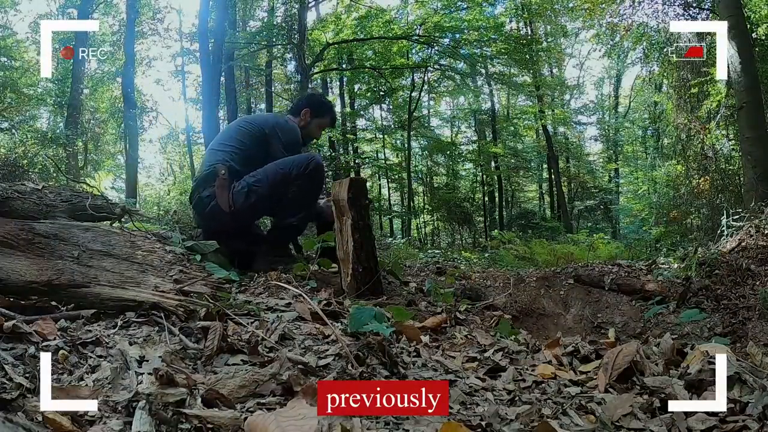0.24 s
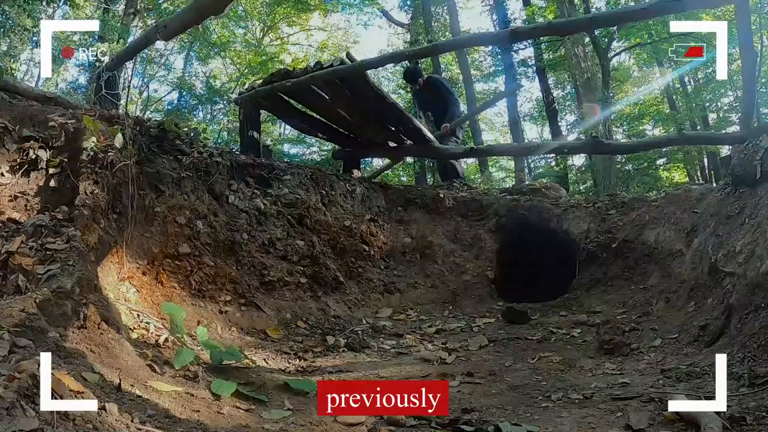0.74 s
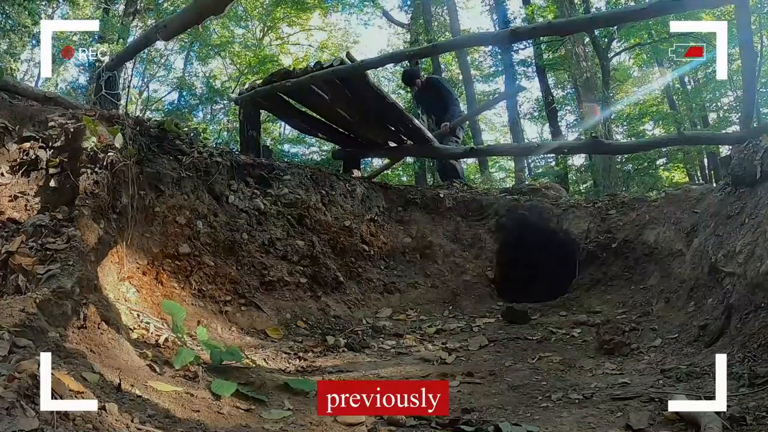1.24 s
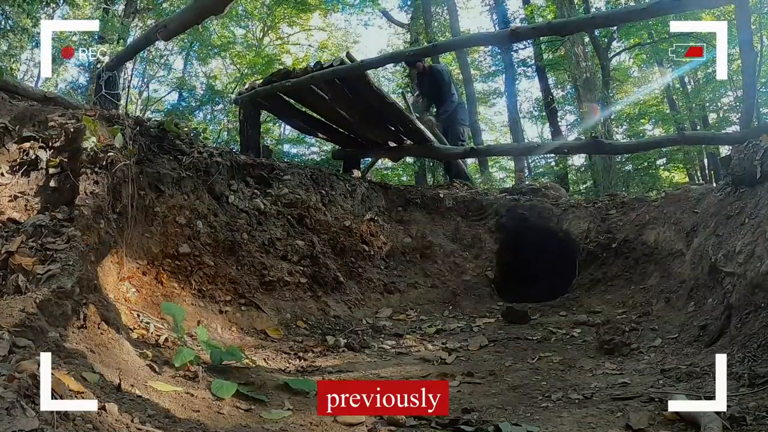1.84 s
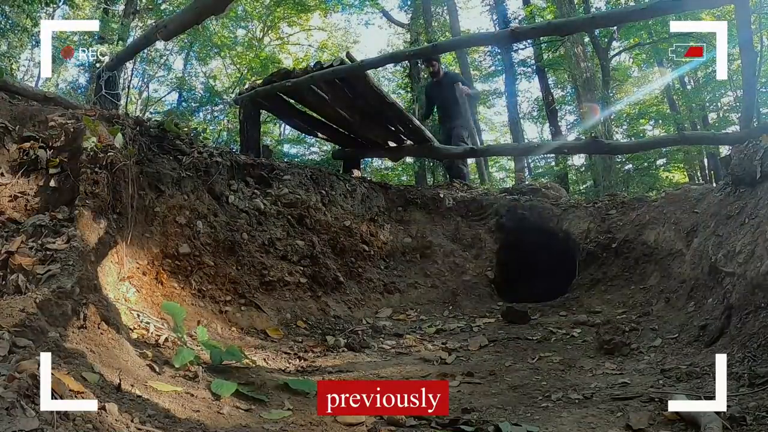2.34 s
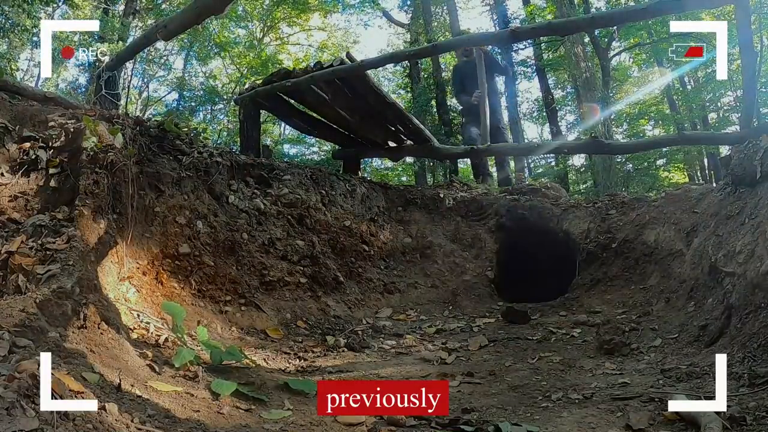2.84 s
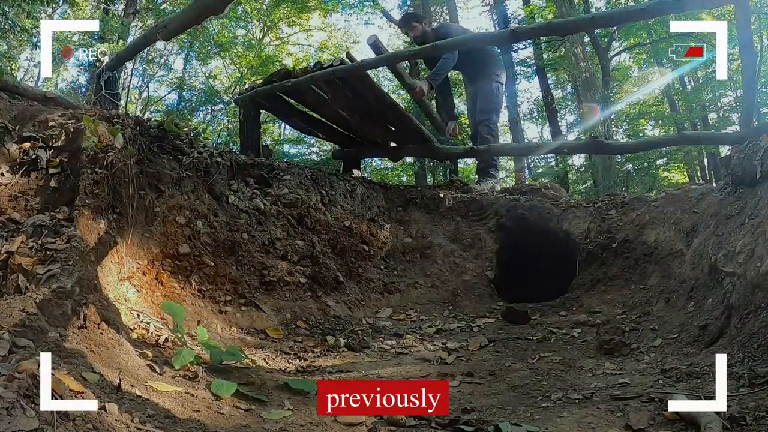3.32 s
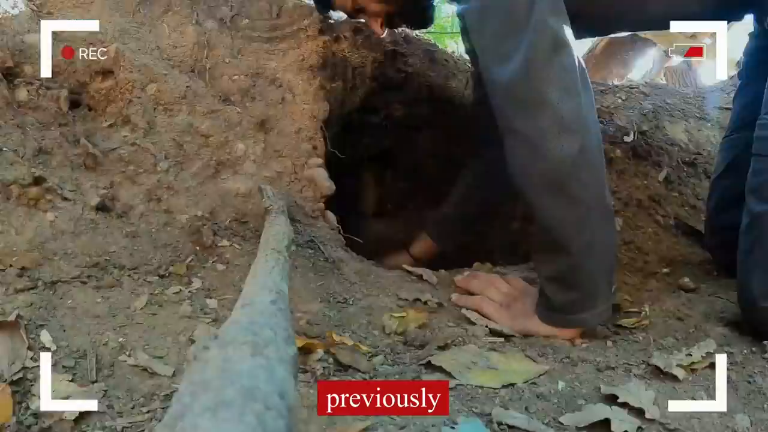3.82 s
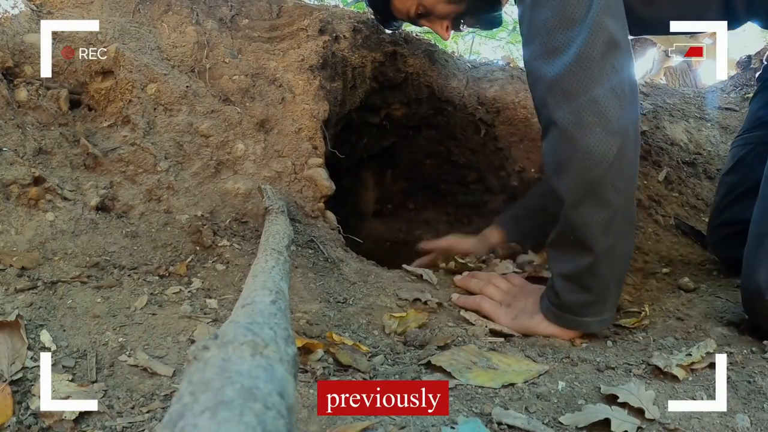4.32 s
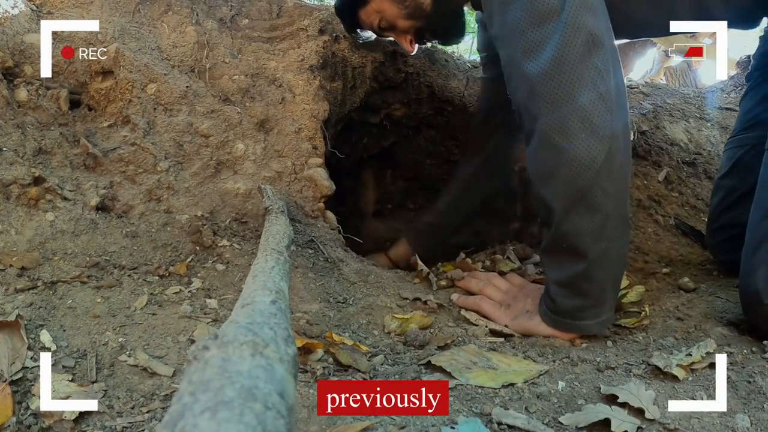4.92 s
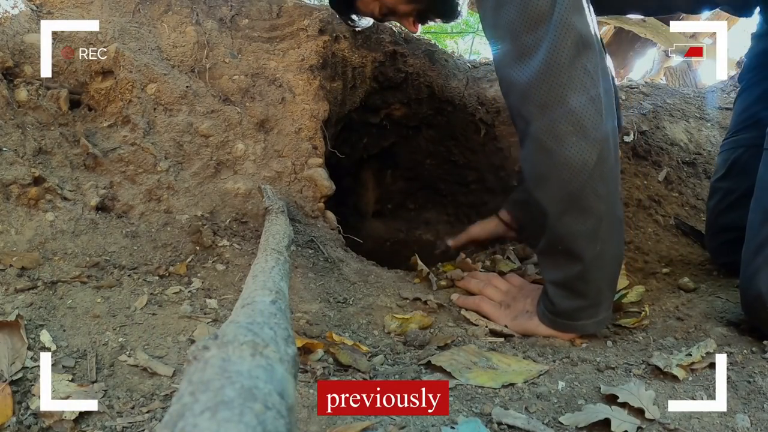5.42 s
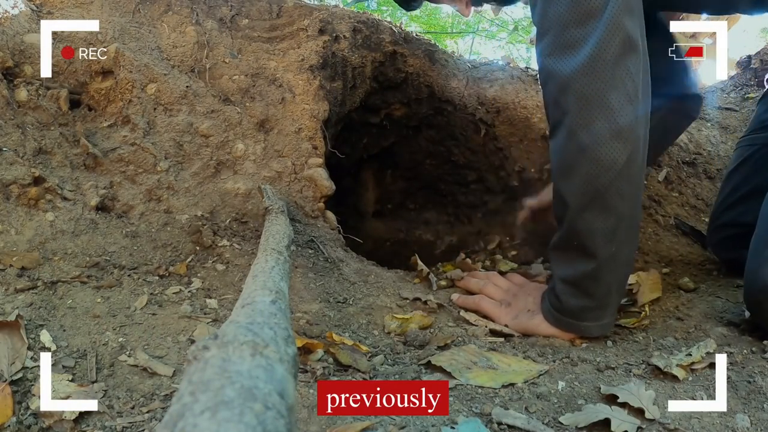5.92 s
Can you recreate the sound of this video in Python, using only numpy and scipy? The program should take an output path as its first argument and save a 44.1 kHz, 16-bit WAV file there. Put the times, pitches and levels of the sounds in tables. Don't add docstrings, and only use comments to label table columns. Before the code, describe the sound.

In a quiet forest, wood thuds, leaves crunch in quick strokes, poles clack hard, then fingers rustle and dig in an earth hollow.

```python
import sys
import numpy as np
from scipy import signal
from scipy.fft import rfft, irfft, next_fast_len
from scipy.io import wavfile
from scipy.ndimage import uniform_filter1d

SR = 44100
rng = np.random.default_rng(int(sys.argv[2]) if len(sys.argv) > 2 else 0)


def transcribe(u):
    v = np.clip(np.atleast_2d(u).T, -1, 1)
    q = np.round(v * 32767).astype(np.int16)
    wavfile.write(sys.argv[1], SR, q)


def makeup_ratio(level_db):
    decades = np.asarray(level_db, float) / 20
    return 10 ** decades


N = 271598

# peak t/s, length/s, level/dB
PUSHES = [
    (.568, 0.021, -28.5),
    (.706, 0.027, -34.5),
    (.857, 0.029, -32.5),
    (1.0, 0.032, -33.5),
    (1.134, 0.029, -34.5),
    (1.282, 0.031, -35.5),
    (1.437, 0.022, -30),
    (1.589, 0.033, -37.5),
    (1.731, 0.021, -36),
]
# peak t/s, length/s, level/dB
PULLS = [(.625, 0.05, -44.5), (.765, 0.01, -37), (.796, 0.017, -45.5), (.915, 0.0072, -33.5),
         (1.051, 0.026, -38), (1.1855, 0.0075, -39.5), (1.209, 0.02, -42.5), (1.341, 0.035, -40),
         (1.405, 0.028, -43), (1.498, 0.015, -33.5), (1.52, 0.019, -44.5), (1.6155, 0.0072, -41),
         (1.691, 0.096, -44)]
# peak t/s, length/s, level/dB
STEPS = [(1.79, 0.016, -57), (1.925, 0.037, -48), (1.807, 0.013, -45.5), (1.864, 0.032, -52),
         (1.895, 0.0063, -47), (1.952, 0.016, -45.5), (2.016, 0.015, -45), (2.084, 0.058, -49.5),
         (2.126, 0.026, -41), (2.187, 0.017, -46.5), (2.229, 0.02, -52.5), (2.274, 0.026, -46),
         (2.384, 0.014, -55), (2.664, 0.0089, -48.5), (3.607, 0.054, -67)]
# peak t/s, length/s, level/dB
BRUSHES = [
    (1.66, 0.055, -50),
    (2.695, 0.026, -43.5),
    (2.76, 0.35, -56.5),
    (2.948, 0.048, -50),
    (3.034, 0.12, -56),
    (3.197, 0.067, -50),
]
# peak t/s, length/s, level/dB
SCOOPS = [(3.879, 0.038, -45.5), (3.937, 0.029, -37.5), (3.97, 0.022, -50), (4.022, 0.035, -42),
          (4.108, 0.049, -47), (4.185, 0.042, -50), (4.228, 0.018, -52), (4.279, 0.025, -45.5),
          (4.308, 0.079, -46.5), (4.404, 0.027, -46), (4.438, 0.049, -43.5), (4.507, 0.04, -50.5),
          (4.571, 0.093, -51.5), (4.654, 0.03, -50), (4.692, 0.015, -43), (4.714, 0.029, -38),
          (4.742, 0.071, -50.5), (4.826, 0.032, -52), (5.924, 0.056, -44), (6.04, 0.05, -48.5),
          (6.142, 0.054, -42.5)]
# peak t/s, length/s, level/dB
DIGS = [(5.037, 0.029, -58.5), (5.165, 0.035, -57.5), (5.214, 0.0087, -60), (5.256, 0.025, -51),
        (5.315, 0.014, -61), (5.365, 0.049, -59.5), (5.472, 0.017, -55), (5.51, 0.025, -62),
        (5.569, 0.025, -62), (5.634, 0.05, -60), (5.737, 0.048, -60), (5.837, 0.047, -60)]
# peak t/s, length/s, level/dB
BARK_SCRAPES = [
    (.118, 0.028, -56),
    (.148, 0.013, -48),
    (.461, 0.0034, -50),
    (3.445, 0.0036, -56),
    (3.772, 0.0078, -43),
    (3.778, 0.0029, -32.5),
]
# t/s, peak level/dB, f/Hz
FAR_SNAPS = [(0.5638, -17.5, 3110), (0.6189, -27, 10900), (0.6926, -23, 10000), (0.7027, -39, 6200),
             (0.7079, -19, 10750), (0.7642, -43, 6500), (0.7958, -34, 9000), (0.8424, -32, 9400),
             (0.8577, -25, 6600), (0.8628, -25, 6560), (0.9134, -46, 6100), (0.9872, -16.5, 6340),
             (0.996, -36, 5300), (1.0037, -24, 7340), (1.0685, -32, 3580), (1.1065, -48, 3600),
             (1.1172, -27, 6260), (1.1365, -26, 9800), (1.1432, -21.5, 6130), (1.1842, -27, 10600),
             (1.2124, -34, 8600), (1.2568, -30, 6400), (1.2709, -21, 6300), (1.2778, -26, 9650),
             (1.2865, -23, 7540), (1.3423, -29, 6560), (1.4242, -18, 6240), (1.4354, -25, 7460),
             (1.4916, -34, 6100), (1.4963, -43, 10200), (1.501, -22, 7100), (1.5593, -27, 10100),
             (1.5868, -36, 10300), (1.6169, -36, 5160), (1.6932, -30, 7070), (1.7196, -26, 5800),
             (1.7269, -23.5, 7400), (1.7315, -24, 9700), (1.7343, -24, 4930), (1.8615, -27.5, 9550),
             (1.8931, -28.5, 8400), (2.0214, -34, 3800), (2.1089, -43, 4700), (2.1264, -26, 3530),
             (2.2692, -31, 9900), (2.2783, -33, 9750)]
# t/s, peak level/dB, f/Hz
NEAR_SNAPS = [(3.8792, -38, 10800), (3.9022, -40, 7900), (3.9352, -30.5, 3020), (3.9723, -40, 7200),
              (3.9818, -37, 14000), (4.1199, -34, 12000), (4.1266, -44, 13000), (4.1625, -52, 1700),
              (4.1968, -43, 5000), (4.1996, -46, 10000), (4.2061, -37, 9300), (4.2343, -37, 8400),
              (4.2471, -41, 2100), (4.294, -32, 13000), (4.3111, -46, 9900), (4.3532, -36, 2600),
              (4.4016, -39, 9300), (4.4041, -37, 5460), (4.4229, -48, 13000), (4.4389, -35, 11000),
              (4.5286, -44, 11000), (4.5371, -33, 11000), (4.5498, -34, 4100), (4.5777, -41, 6100),
              (4.5884, -44, 6960), (4.5996, -52, 8300), (4.6038, -37, 2290), (4.6115, -37, 11000),
              (4.6538, -46, 13000), (4.6559, -37, 13000), (4.6639, -34, 5400), (4.6766, -41, 11000),
              (4.6808, -42, 11000), (4.6931, -36, 11000), (4.7133, -33, 12100), (4.7256, -47, 10000),
              (4.76, -36, 11000), (4.7925, -41, 5600), (4.8199, -53, 9500), (4.8302, -47, 12000),
              (4.8478, -42, 14000), (4.8638, -38, 6100), (5.0272, -37, 5600), (5.2141, -40, 12900),
              (5.2488, -43, 4000), (5.4568, -47, 13000), (5.4727, -37, 7800), (5.6352, -52, 7500),
              (5.7213, -47, 7600), (5.836, -41, 5900), (5.9125, -45, 6900), (5.9209, -35, 13000),
              (5.9483, -33, 5200), (5.9556, -35, 11000), (6.0283, -48, 2600), (6.0436, -30.5, 11100),
              (6.1403, -38, 8500), (6.1437, -37, 7150)]
# t/s, peak level/dB, f/Hz
BODY_BUMPS = [(0.565, -29, 825), (0.581, -28.5, 776), (0.703, -35, 865), (0.854, -32, 945),
              (0.986, -27.5, 803), (1.048, -39.5, 690), (1.138, -37, 790), (1.274, -29.5, 820),
              (1.341, -39, 1110), (1.384, -37, 500), (1.433, -27, 720), (1.495, -35, 567),
              (1.728, -35.5, 930), (1.894, -36, 1410), (2.081, -44, 566), (2.125, -36, 1340),
              (2.39, -30.5, 543), (2.4285, -27.5, 1520), (2.698, -36, 605), (3.173, -40, 580)]
# t/s, level/dB, contact/ms, pitch ratio, ring share
STUMP_BLOWS = [
    (.1502, -13, 0.13, 0.925, 0.62),
]
# t/s, level/dB, contact/ms, pitch ratio, ring share
A_KNOCKS = [
    (1.882, -38.5, 0.096, 1.04, 0.54),
    (1.892, -30, 0.12, 0.55, 0.32),
    (2.08, -32, 0.12, 0.73, 0.61),
    (2.427, -22.5, 0.11, 1.13, 0.54),
    (3.498, -20, 0.19, 0.95, 1.17),
    (3.508, -42, 0.052, 1.7, 1.2),
    (3.522, -8, 0.028, 1.0, 0.78),
]
# t/s, level/dB, contact/ms, pitch ratio, ring share
B_KNOCKS = [
    (2.1905, -17.5, 0.72, 1.46, 0.22),
    (2.385, -37, 0.086, 0.93, 0.27),
    (3.172, -27, 0.75, 1.7, 0.34),
    (3.7395, -25.5, 0.0062, 0.73, 0.99),
    (3.7695, -24, .002, 2.1, 0.47),
    (3.7765, -12, 0.0076, 1.0, 1),
    (4.162, -37, 0.37, 0.43, 0.23),
]
# f/Hz, level/dB, t60/s
STUMP_MODES = [(178, 2, 0.078), (239, 8, 0.099), (301, 27, 0.062), (346, 22.5, 0.059), (474, 16, 0.058),
               (917, 18, 0.033), (1140, 8, 0.032)]
# f/Hz, level/dB, t60/s
POLE_A_MODES = [(240, -7.5, 0.059), (397, -15, 0.077), (551, -6.5, 0.043), (790, -2, 0.031),
                (975, -16, 0.051), (1160, -4, 0.014), (1410, -11, 0.015), (1764, -6.5, 0.031),
                (1950, -5, 0.059), (2160, -27, 0.048), (2770, -2.5, 0.0092), (3496, -1, 0.022)]
# f/Hz, level/dB, t60/s
POLE_B_MODES = [(233, -2.5, 0.034), (384, -5, 0.012), (520, -34, 0.017), (735, -11, 0.022),
                (852, -14, 0.055), (1027, -14.5, 0.033), (1310, -8, 0.024), (1750, -10, 0.017),
                (2010, -2.5, 0.03), (2790, -17, .03), (3550, -10, 0.026)]
# low f/Hz, high f/Hz, level/dB, decay/ms
SPLINTERS = [(400, 2500, 0, 5.5), (2500, 5000, -4, 2.4), (5000, 17000, -7, 1.1)]
# t/s, peak level/dB
CLODS = [(3.933, -41.5), (3.944, -39.5), (3.957, -44), (4.025, -40.5), (4.038, -47), (4.113, -44),
         (4.163, -37.5), (4.18, -43), (4.279, -42), (4.385, -39), (4.394, -39), (4.404, -39.5),
         (4.453, -44), (4.628, -43.5), (4.763, -43), (4.903, -42), (4.916, -38.5), (5.021, -43),
         (5.035, -34.5), (5.043, -40), (5.053, -40), (5.162, -48), (5.182, -51), (5.249, -45), (5.284, -39),
         (5.295, -53), (5.381, -41), (5.487, -48), (5.568, -43.5), (5.578, -48), (5.637, -45), (5.657, -41),
         (5.746, -46), (5.818, -54), (5.844, -53), (5.94, -53), (5.96, -45), (5.971, -42), (6.097, -48),
         (6.105, -43)]
# t/s, peak level/dB, f/Hz
THUDS = [(3.897, -32.5, 180), (3.94, -31.5, 155), (3.999, -37, 180), (4.025, -39, 178), (4.052, -38, 249),
         (4.096, -37, 181), (4.126, -39, 152), (4.231, -33, 158), (4.256, -33, 210), (4.288, -32, 215),
         (4.341, -47, 219), (4.391, -36, 184), (4.525, -32.5, 161), (4.577, -33.5, 190), (4.607, -37, 170),
         (4.66, -37, 200), (4.698, -34, 270), (4.727, -36, 189), (4.772, -38, 312), (4.816, -34, 231),
         (4.839, -39, 200), (4.916, -36, 161), (4.952, -34, 260), (5.099, -32.5, 185), (5.173, -34, 203),
         (5.213, -33, 290), (5.263, -40, 240), (5.286, -40, 220), (5.312, -37, 180), (5.337, -31, 222),
         (5.385, -32.5, 172), (5.412, -33, 340), (5.462, -36, 344), (5.529, -36, 256), (5.554, -33, 285),
         (5.578, -34, 183), (5.644, -36, 278), (5.707, -29.5, 176), (5.805, -39, 190), (5.916, -30, 217),
         (5.947, -31.5, 161), (5.979, -31, 275), (6.04, -36.5, 343), (6.092, -39, 343)]
# f/Hz, level/dB per Hz
FAR_COLOUR = [(350, -16), (600, 0.5), (801, 8.5), (1290, -0.5), (1450, 4), (2150, -7), (2750, -17),
              (3350, -10.5), (4340, -15.5), (5050, -7.5), (6290, -9.5), (7940, -12.5), (10300, -9.5),
              (16000, -29)]
# f/Hz, level/dB per Hz
NEAR_COLOUR = [(350, 0.5), (600, -2), (687, 8), (1030, -2), (1360, -2), (2190, -7.5), (3520, -15),
               (5590, -12), (15500, -14)]
# f/Hz, level/dB per Hz
OPEN_RUMBLE = [(15, -52), (25, -23), (102, 1.5), (168, 1.5), (477, -13.5), (802, -18.5), (1320, -25.5),
               (1540, -30), (2500, -41.5), (3250, -41), (5500, -120)]
# f/Hz, level/dB per Hz
HOLLOW_RUMBLE = [(15, -62), (25, -30), (144, 1.5), (221, 1.5), (393, -6.5), (772, -17), (1090, -26),
                 (1350, -24.5), (1600, -33.5), (2500, -43.5), (3250, -50), (5500, -120)]
# t/s, effort/dB
EFFORT = [(0, 1), (.55, 2.5), (.57, 5), (.85, 5), (.95, 0), (1.4, 4), (1.8, 1.5), (2.45, 2.5), (2.55, 0),
          (3.2, 2), (3.75, 2), (4.05, -1), (4.6, 2), (4.95, 2), (6.16, 1.5)]
# f/Hz, level/dB per Hz
HISS = [(600, -40), (1100, -14), (1800, -7), (2650, -19), (3400, -6), (6000, -7), (11000, -8), (16000, -13)]
# f/Hz, level/dB per Hz
GUST = [(15, -45), (25, -16), (80, 14.5), (199, 3), (375, -6.5), (1120, -60), (3300, -120)]
# t/s, level/dB
WIND = [(0, -64.5), (.54, -76), (.57, -55), (1.2, -59), (1.4, -24), (1.58, -29), (1.75, -44), (2.0, -37.5),
        (2.2, -23), (2.4, -52), (2.6, -40), (3.25, -67), (3.58, -44), (3.7, -35), (3.85, -43), (4.0, -97)]
# t/s, level/dB
BUFFETS = [(1.386, -15.5), (1.407, -20), (1.491, -27), (1.517, -22), (1.538, -24.5), (1.562, -19.5),
           (1.611, -35), (1.63, -24.5), (1.644, -27), (1.691, -27.5), (1.821, -26), (1.841, -26),
           (1.954, -29), (1.975, -15), (1.991, -21), (2, -16), (2.03, -16.5), (2.072, -30.5),
           (2.161, -22.5), (2.196, -17.5), (2.226, -27), (2.249, -25.5), (2.339, -24.5), (2.365, -27),
           (2.393, -17), (2.403, -20), (2.581, -28), (3.48, -32.5), (3.711, -24), (3.754, -34)]

# rising share of length, soil body/dB, body lost per force/dB per dB, brightness/dB
PUSH, PULL, STEP = (0.79, -14, -0.35, 1.5), (0.58, -19, 0, 1), (0.5, -17.5, -0.18, -5.5)
SCOOP, DIG, SCRAPE = (0.31, -9, 0.58, 3.5), (0.37, -8, -0.27, -4), (1.6, -15, 1.5, 5)
BRUSH = (0.56, -12, 0.18, 7)
USUAL_FORCE_DB = -45
# rumble level/dB, hiss level/dB
CLEARING, WOODS, HOLLOW = (-55.5, -58.5), (-44, -57.5), (-48, -62)

FIRST_CUT_S, CUT_S = 0.556, 3.85
T_S = np.arange(N) / SR
CLOSE = np.clip((T_S - CUT_S) / 0.02, 0, 1)


def unit(x):
    return x / np.sqrt(np.mean(x ** 2) + 1e-30)


def shape(table, size):
    bin_hz = np.arange(size // 2 + 1) * SR / size + 1
    hz, db = np.array(table, float).T
    return makeup_ratio(np.interp(np.log(bin_hz), np.log(hz), db)), bin_hz


def bandpass(x, low_hz, high_hz, order=2):
    return signal.sosfilt(signal.butter(order, [low_hz, high_hz], "bandpass", fs=SR, output="sos"), x)


def add(out, at_s, sound):
    i = int(at_s * SR)
    out[..., i:i + sound.shape[-1]] += sound[..., :N - i]


def ports(x, share):
    step_rad, resonance_hz, hz_per_rad = 0.36, 2900, 20000
    left, right = np.broadcast_to(x, (2, N))
    hz = np.arange(N // 2 + 1) * SR / N + 1
    lag_rad = step_rad / (1 + (resonance_hz / hz) ** 6) + hz / hz_per_rad
    return np.array([irfft(rfft(left) * np.exp(-1j * share * lag_rad), N), right])


def crunches(table, gesture, colour, loose_hz, grain_db, clump_db, ripple_db, bite, edge, size=8192):
    lead_s = 0.07
    out, late = np.zeros((2, N)), np.arange(size) / SR - lead_s
    gain, hz = shape(colour, size)
    share, soil_db, soil_loss, bright_db = gesture
    tilt = makeup_ratio(bright_db * np.clip(np.log2(hz / 7500) / 0.61, -1, 1) / 2)
    low = 1 / (1 + (hz / 2700) ** 6)
    for s, length_s, db in table:
        rise_s = max(share * length_s - 0.004, 0.001)
        fall_s = max((1 - share) * length_s, 0.002)
        rising = (np.maximum(-late, 0) / rise_s) ** bite
        falling = (np.abs(late) / fall_s) ** edge
        reach = np.where(late < 0, rising, falling)
        stir_s = np.minimum(length_s, np.where(late < 0, 0.022 * share, 0.02))
        litter = makeup_ratio(-15) * np.exp(-np.abs(late) / stir_s)
        snaps = rng.standard_normal((2, size)) * makeup_ratio(grain_db * rng.exponential(size=size))
        clumps = makeup_ratio(clump_db * np.repeat(rng.standard_normal(size // 64), 64))
        swarm = snaps * clumps / np.sqrt(np.mean(snaps ** 2) * np.mean(clumps ** 2))
        mid, side = rfft(swarm * (makeup_ratio(-6 * reach) + litter))
        ripple = makeup_ratio(ripple_db * np.interp(hz, np.linspace(0, SR / 2, num=40), rng.standard_normal(40)))
        leaf = unit(gain * ripple * tilt * (1 - low))
        soil = unit(gain * ripple * low) * makeup_ratio(soil_db - soil_loss * (db - USUAL_FORCE_DB))
        apart = side * np.clip(0.05 + hz / loose_hz, 0, 1)
        stroke = irfft(np.array([mid + apart, mid - apart]) * (leaf + soil), size)
        add(out, s - lead_s, makeup_ratio(db) * stroke)
    return out


def grains(table, rise_s, fall_s, level_db, dust_db, dust_hz, size=4000):
    out, t = np.zeros(N), (np.arange(size) - size // 2) / SR
    reach = np.where(t < 0, np.exp(-(t / rise_s) ** 2), 1 / np.cosh(t / fall_s))
    for s, db, hz in table:
        noise = rng.standard_normal(size)
        ring = np.cos(2 * np.pi * hz * t + noise[0])
        dust = makeup_ratio(dust_db) * unit(bandpass(noise, *dust_hz))
        add(out, s + t[0], makeup_ratio(db + level_db) * (ring + dust) * reach)
    return out


def raked_litter():
    far = crunches(BRUSHES, BRUSH, NEAR_COLOUR, loose_hz=30000, grain_db=2, clump_db=2, ripple_db=2.5,
                   bite=2.2, edge=1.6)
    for strokes, gesture in [(PUSHES, PUSH), (PULLS, PULL), (STEPS, STEP)]:
        far = far + crunches(strokes, gesture, FAR_COLOUR, loose_hz=40000, grain_db=2.3, clump_db=2.2,
                             ripple_db=3, bite=2.5, edge=1.6)
    far = far + grains(FAR_SNAPS, 0.00014, 0.0013, level_db=-7, dust_db=-4.5, dust_hz=[3100, 14000])
    far = far + grains(BODY_BUMPS, 0.0024, 0.0029, level_db=-5, dust_db=-7.5, dust_hz=[450, 1600])
    return ports(far * (T_S > FIRST_CUT_S), share=1)


def hand_in_leaves():
    near = grains(NEAR_SNAPS, 0.0002, 0.0004, level_db=-6, dust_db=-1, dust_hz=[1800, 15000])
    for strokes, gesture in [(SCOOPS, SCOOP), (DIGS, DIG)]:
        near = near + crunches(strokes, gesture, NEAR_COLOUR, loose_hz=90000, grain_db=2.5, clump_db=2.2,
                               ripple_db=2.5, bite=2.6, edge=2.8)
    return near


def knocks(table, modes, swell_ms, glancing=True, size=6000):
    bloom_per_cycle = 0.021
    out, t = np.zeros(N), np.arange(size) / SR
    mode_hz, mode_db, t60_s = np.array(modes).T[:, :, None]
    for s, db, contact_ms, ratio, share in table:
        hz, swell = mode_hz * ratio, swell_ms * share
        phase = 2 * np.pi * (hz * t + glancing * rng.random(hz.shape))
        weight = makeup_ratio(mode_db) / (1 + (2 * np.pi * hz * contact_ms / 1000) ** 2)
        bloom = 1 - np.exp(-t * 1000 / (swell * bloom_per_cycle * mode_hz * t60_s))
        decay = np.exp(-np.log(1000) * t / (t60_s * share))
        rise = 1 - np.exp(-t * 1000 / swell)
        body = rise * np.sum(weight * bloom * np.sin(phase) * decay, axis=0)
        crack = 0
        for low_hz, high_hz, band_db, decay_ms in SPLINTERS:
            band = unit(bandpass(rng.standard_normal(size), low_hz, high_hz))
            crack = crack + makeup_ratio(band_db) * band * np.exp(-t * 1000 / (decay_ms * share))
        crack_db = -2.5 - 60 * contact_ms - 0.36 * (db + 29.5)
        add(out, s, makeup_ratio(db) * (body / np.abs(body).max() + makeup_ratio(crack_db) * crack * np.sqrt(rise)))
    return out


def wood():
    blows = knocks(STUMP_BLOWS, STUMP_MODES, swell_ms=2.3, glancing=False)
    blows = blows + knocks(A_KNOCKS, POLE_A_MODES, swell_ms=0.83)
    blows = blows + knocks(B_KNOCKS, POLE_B_MODES, swell_ms=2.5)
    return signal.sosfilt(signal.butter(2, 120, "highpass", fs=SR, output="sos"), blows)


def bark():
    return crunches(BARK_SCRAPES, SCRAPE, NEAR_COLOUR, loose_hz=90000, grain_db=2, clump_db=1, ripple_db=2,
                    bite=2, edge=2)


def earth():
    rows = [(s, db, 678 * (1 + 0.12 * rng.standard_normal())) for s, db in CLODS]
    clods = grains(rows, 0.0015, 0.003, level_db=-0.5, dust_db=-14.5, dust_hz=[500, 2200])
    return clods + grains(THUDS, 0.0025, 0.0044, level_db=-3, dust_db=-20.5, dust_hz=[120, 500])


def walk(rate_hz):
    k = int(SR / rate_hz)
    held = np.repeat(rng.standard_normal(N // k + 2), k)
    return unit(uniform_filter1d(uniform_filter1d(held, k), k)[:N])


def restless(table, count, swell_db, flicker_db, rate_hz, loose_hz):
    size = next_fast_len(N)
    gain, hz = shape(table, size)
    out, swell = 0, walk(rate_hz)
    for centre_hz in table[1][0] * 2.0 ** np.arange(count):
        octave = np.cos(np.clip(np.log2(hz / centre_hz), -1, 1) * np.pi / 2)
        mid, side = irfft(rfft(rng.standard_normal((2, size))) * gain * octave, size)[:, :N]
        side = side * np.sqrt(np.clip(centre_hz / loose_hz, 0, 1))
        level = makeup_ratio(swell_db * swell + flicker_db * walk(2 * rate_hz))
        out = out + level * np.array([mid + side, mid - side])
    return unit(out)


def buffets():
    out, t = np.zeros((2, N)), (np.arange(2000) - 1000) / SR
    for s, db in BUFFETS:
        hz = 269 + 4.5 * db
        phase, detune = rng.standard_normal(2)
        eddy = np.cos(2 * np.pi * hz * t + phase) * np.exp(-(t * hz / 0.47) ** 2)
        tap_hz = 420 * (1 + 0.19 * detune)
        tap = np.cos(2 * np.pi * tap_hz * t + np.array([[0], [1.4]])) * np.exp(-(t / 0.0025) ** 2)
        tap = tap * makeup_ratio(-17 + 0.7 * (db + 16)) * np.array([[1], [0.65]])
        add(out, s + t[0], makeup_ratio(db + 5) * (eddy * np.array([[1], [0]]) + tap))
    return out


def wind():
    gust_db = np.interp(T_S, *np.transpose(WIND)) - 3
    gust = restless(GUST, count=6, swell_db=3.5, flicker_db=2, rate_hz=40, loose_hz=9e9)[0]
    return gust * makeup_ratio(gust_db) * np.array([[1], [0]]) + buffets()


def still_db(column):
    clearing, woods, hollow = CLEARING[column], WOODS[column], HOLLOW[column]
    return np.where(T_S < FIRST_CUT_S, clearing, woods + CLOSE * (hollow - woods))


def rumble():
    woods = restless(OPEN_RUMBLE, count=8, swell_db=2.2, flicker_db=1.2, rate_hz=25, loose_hz=16000)
    hollow = restless(HOLLOW_RUMBLE, count=8, swell_db=2.2, flicker_db=1.2, rate_hz=25, loose_hz=70000)
    exposed = np.clip((T_S - FIRST_CUT_S) / 0.002, 0, 1) * (1 - CLOSE)
    thin = (T_S < FIRST_CUT_S) * 14 + 9 * np.clip((T_S - CUT_S) / 1.3, 0, 1) ** 3
    ground = exposed * woods + (1 - exposed) * hollow + thin * np.diff(hollow, prepend=0)
    return makeup_ratio(still_db(0) + np.interp(T_S, *np.transpose(EFFORT))) * ground


def crumbs(rate_hz, spread_db):
    ticks = (rng.random(N) < rate_hz / SR) * rng.standard_normal(N)
    return unit(bandpass(ticks * makeup_ratio(spread_db * rng.standard_normal(N)), 4000, 15500))


def leaf_hiss(strokes):
    settle_db, settle_s = -14, 0.17
    settling = uniform_filter1d(strokes ** 2, int(settle_s * SR)) * (T_S > FIRST_CUT_S) * makeup_ratio(2 * settle_db)
    hiss_db = 10 * np.log10(makeup_ratio(2 * still_db(1)) + np.abs(settling))
    hiss = restless(HISS, count=5, swell_db=1.3, flicker_db=0.8, rate_hz=25, loose_hz=24000)
    hiss = hiss + 0.3 * CLOSE * np.diff(hiss, prepend=0)
    hiss = hiss + makeup_ratio(-22 + 7 * CLOSE) * crumbs(rate_hz=400, spread_db=7)
    dip = bandpass(hiss, 3000, 4300, order=1)
    lift = bandpass(hiss, 1900, 2700, order=1)
    hiss = ports(hiss, share=0.87) + CLOSE * (0.37 * lift - 0.71 * dip)
    lean_db = np.array([[1.3], [-1.3]]) * (1.5 - CLOSE)
    return makeup_ratio(hiss_db + lean_db) * hiss


def scene():
    far, near = raked_litter(), hand_in_leaves()
    out = far + ports(wood(), share=1) + ports(near + earth(), share=0.69) + bark()
    return out + wind() + rumble() + leaf_hiss(far[0] + near[0])


def band_limit(x):
    return signal.sosfilt(signal.butter(12, 16810, fs=SR, output="sos"), x)


def record(dry):
    narrow_s, widen_s, top_hz = 3.88, 0.45, 15950
    since_s = T_S - narrow_s
    narrow = (since_s > 0) * np.exp(-(since_s / widen_s) ** 2)
    mix = dry + narrow * (dry.mean(axis=0) - dry)
    mix = signal.sosfilt(signal.ellip(12, 0.2, 56, top_hz, fs=SR, output="sos"), mix)
    return band_limit(mix)


dry = scene()
out = record(dry)
transcribe(out)
```